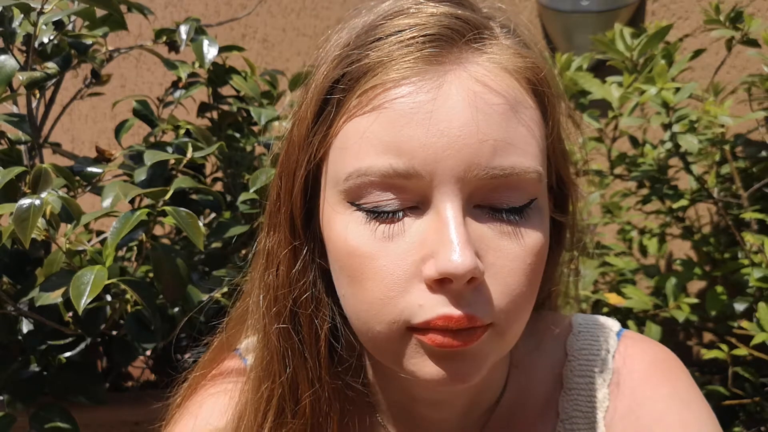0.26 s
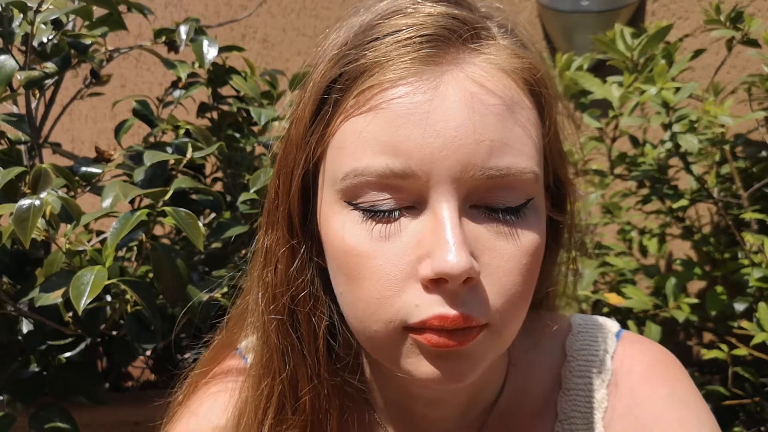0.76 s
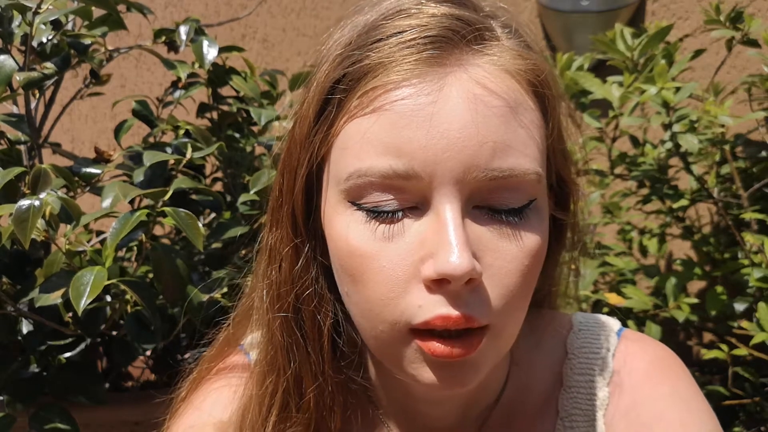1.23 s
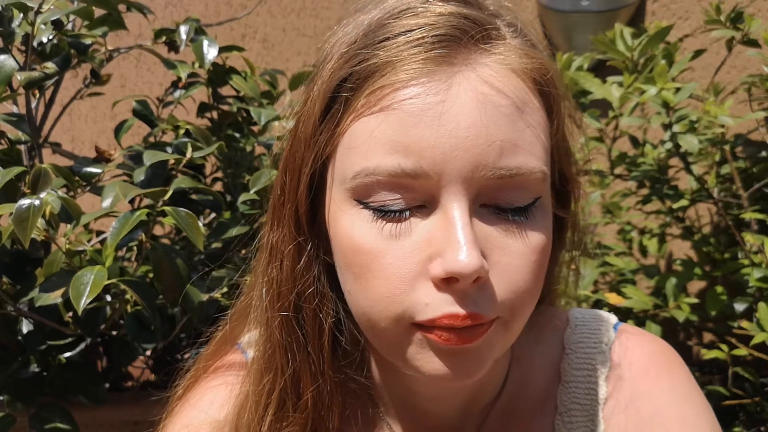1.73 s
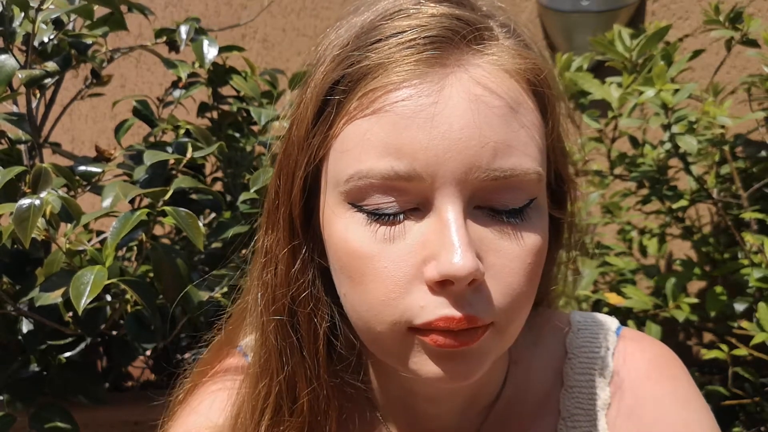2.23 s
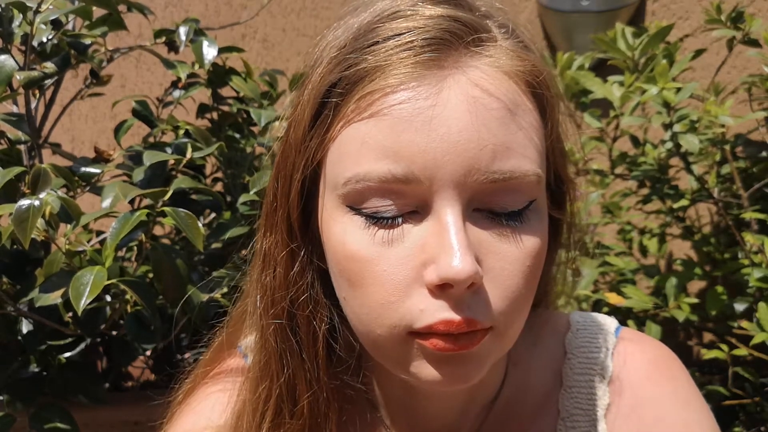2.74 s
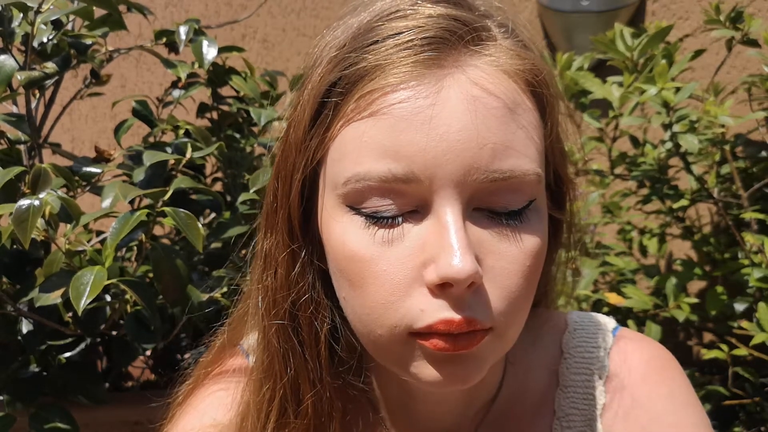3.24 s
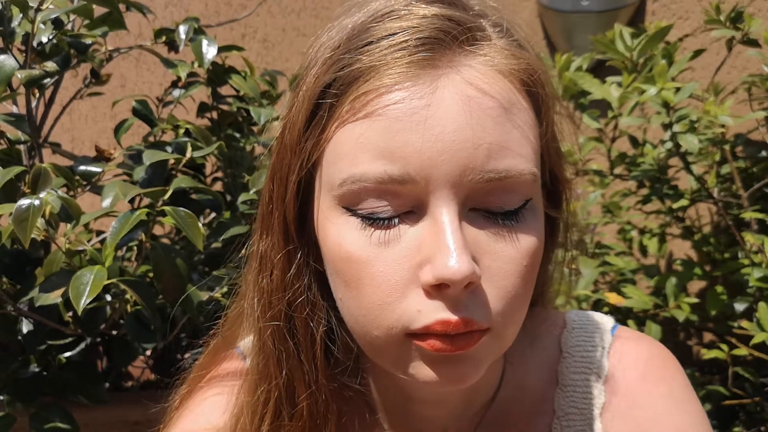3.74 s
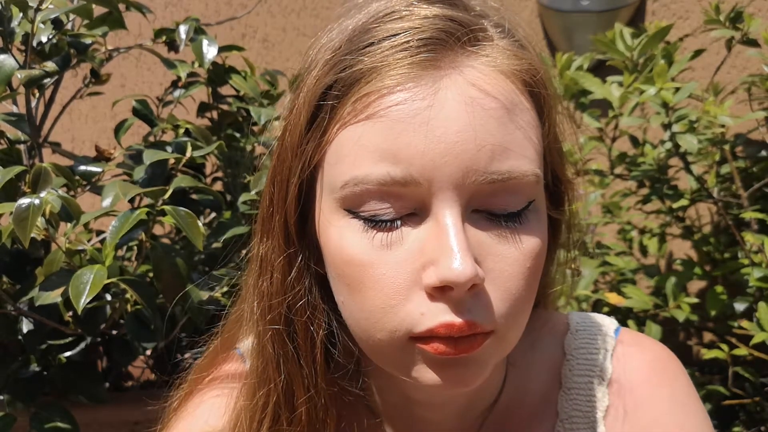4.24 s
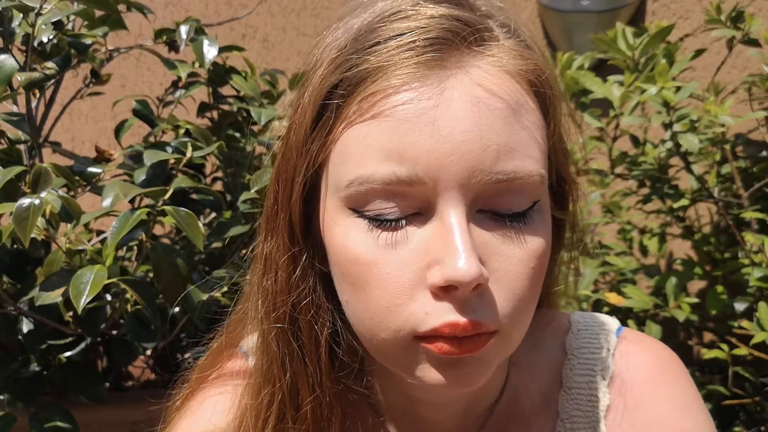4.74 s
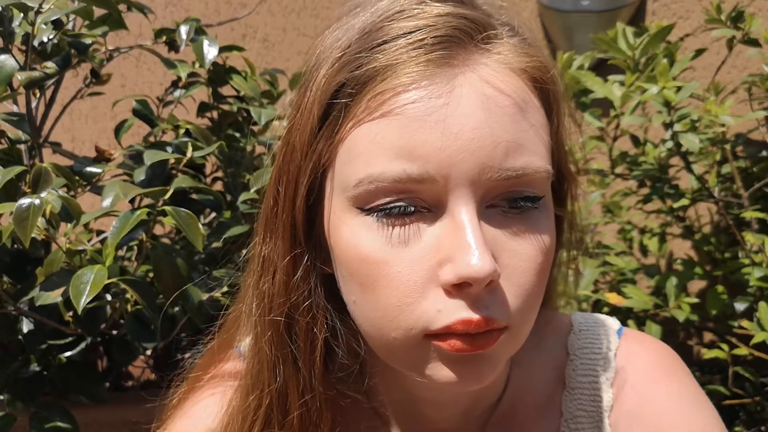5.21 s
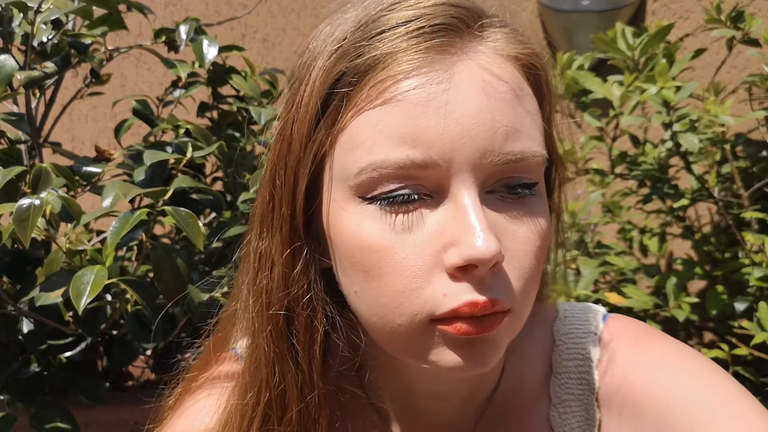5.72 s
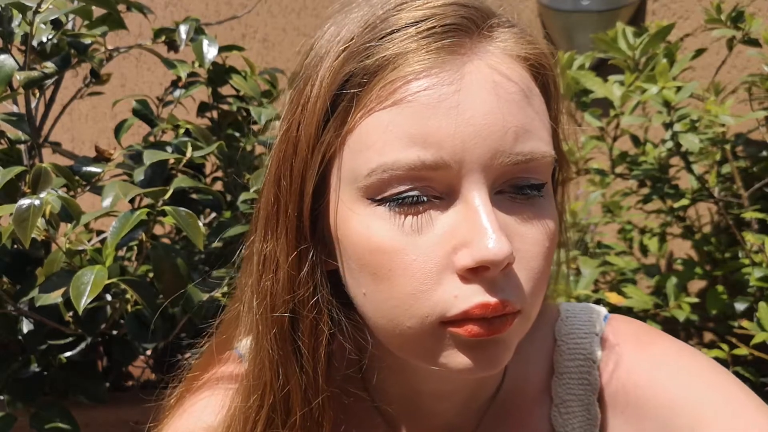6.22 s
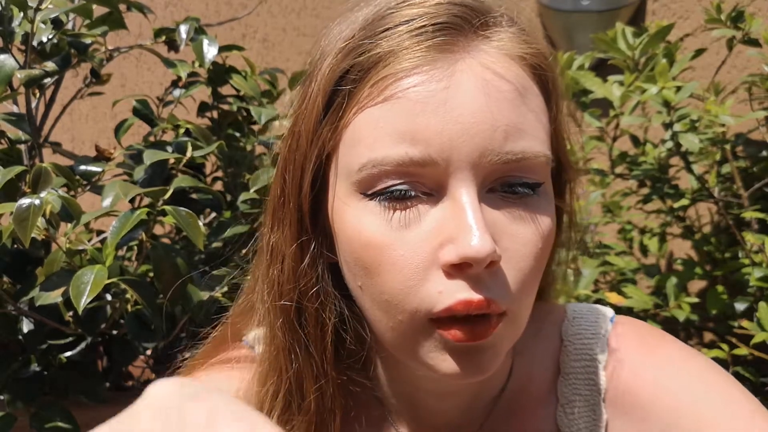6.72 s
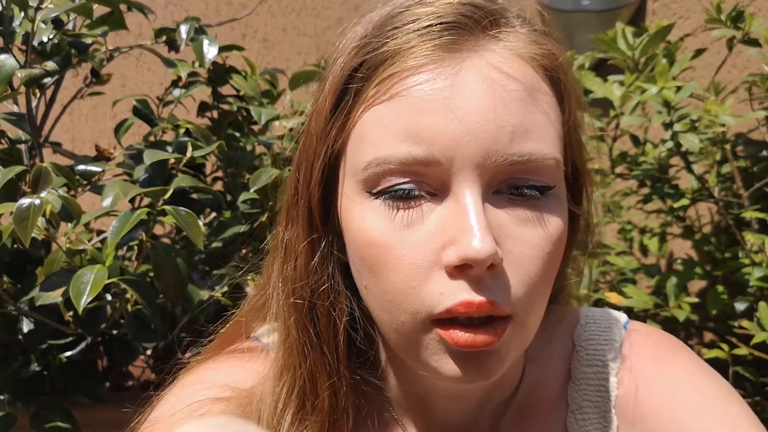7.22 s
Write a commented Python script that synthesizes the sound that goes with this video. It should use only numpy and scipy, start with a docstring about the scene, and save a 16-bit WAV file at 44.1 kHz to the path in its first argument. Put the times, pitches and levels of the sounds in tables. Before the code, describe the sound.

A small plastic jar clicks, crackles and scrapes close to the microphone outdoors, with low wind rumble, faint far traffic and a bird, then a knock.

```python
"""Plastic jar opened in a garden

A small jar is turned and opened close to a microphone; lid and nails tick, crackle and scrape.
Snaps, noise rings and friction noise pass through the resonances of its walls.
Shaped noise makes wind buffeting and a far town; wavering sines make the mount's swing and the hum.
A distant bird sings in gliding sines; at the end a hand knocks on the camera's shell."""
import sys
import numpy as np
from scipy import signal
from scipy.fft import rfft, irfft, next_fast_len
from scipy.io import wavfile
from scipy.ndimage import uniform_filter1d, map_coordinates

SR = 44100
rng = np.random.default_rng(int(sys.argv[2]) if len(sys.argv) > 2 else 0)


def store_wav(level_fs):
    """Save 16-bit WAV to argv[1]."""
    pcm = np.round(np.clip(np.atleast_2d(level_fs), -1, 1) * 32767)
    wavfile.write(sys.argv[1], SR, pcm.T.astype(np.int16))


N = 329427

# response of the jar's walls: (frequency [Hz], gain [dB])
JAR_WALLS = [(500, -44), (1300, -25.5), (1900, -9), (2600, -12.5), (3500, -6.5), (4300, -7.5), (5700, 0.5),
             (6800, 1.5), (7900, 5.5), (10000, 1), (10800, -5.5), (15000, -12), (16500, -32.5)]


def amp(db):
    """Amplitude from dB."""
    return 10 ** (np.asarray(db) / 20)


def unit(x):
    """Scale to rms 1."""
    return x / np.sqrt(np.mean(x ** 2) + 1e-20)


def along(points, hz):
    """Interpolate (frequency [Hz], value) points on a log frequency axis."""
    f, v = np.transpose(points)
    return np.interp(np.log(hz + 1), np.log(f + 1), v)


def curves(rows):
    """One value per sample for each column after the time [s]."""
    s, *cols = np.transpose(rows)
    return [np.interp(np.arange(N) / SR, s, c) for c in cols]


def wobble(knots_per_s):
    """Smooth random curve: a spline through normal random knots."""
    knots = rng.standard_normal(int(N * knots_per_s / SR) + 4)
    return map_coordinates(knots, [np.arange(N) * knots_per_s / SR])


def filtered(x, response):
    """Multiply the spectrum of x by a response of frequency."""
    m = next_fast_len(N + SR // 2)
    return irfft(rfft(x, m) * response(np.fft.rfftfreq(m, 1 / SR)), m)[..., :N]


def rush(spectrum, alike):
    """Stereo noise of rms 1; the mid/side balance sets left-right likeness by frequency."""
    def mid_side_gains(hz):
        angle = np.arccos(np.clip(along(alike, hz), -1, 1)) / 2
        return amp(along(spectrum, hz)) * [np.cos(angle), np.sin(angle)]

    mid, side = filtered(rng.standard_normal((2, N)), mid_side_gains)
    return unit(np.array([mid + side, mid - side]))


def strike(force, colour_db, lead_s, size=4096):
    """Stereo force through a minimum-phase colour; a positive lead puts the left first."""
    hz = np.fft.rfftfreq(size, 1 / SR)
    # folding the cepstrum makes the filter causal
    cepstrum = irfft(colour_db(hz) * np.log(10) / 20)
    cepstrum[1:size // 2] *= 2
    cepstrum[size // 2 + 1:] = 0
    y = irfft(rfft(force, size) * np.exp(rfft(cepstrum)))
    y[1] = np.roll(y[1], round(lead_s * SR))
    energy = np.sum(y ** 2, axis=1, keepdims=True)
    return y / np.sqrt(energy / (.005 * SR))  # rms 1 if packed into 5 ms


def add(track, s, sound, pan_db):
    """Mix a stereo sound in at time s; positive pan is louder on the left."""
    gains = unit(amp([[pan_db / 2], [-pan_db / 2]]))
    part = track[:, round(s * SR):][:, :sound.shape[1]]
    part += (gains * sound)[:, :part.shape[1]]


def spells(rows, attack_s, release_s):
    """Gain of (start [s], length [s], level [dB]) events with linear fades; overlaps add in power."""
    t, power = np.arange(N) / SR, np.zeros(N)
    for s, length_s, db in rows:
        fades = np.minimum((t - s) / attack_s, (s + length_s - t) / release_s)
        gate = np.clip(.5 + fades, 0, 1)
        power += (amp(db) * gate) ** 2
    return np.sqrt(power)


def yard(x, delay_s=0.0045):
    """Wall and hedges scatter sound into a short decaying noise tail, different on each side."""
    # (frequency [Hz], t60 [s])
    decay = [(300, 0.073), (2000, 0.23), (8000, 0.15), (16000, 0.088)]
    hz, t, z = signal.stft(rng.standard_normal((2, SR // 2)), SR, nperseg=256)
    z = z * amp(-60 * t / along(decay, hz)[:, None])
    tail = signal.istft(z, SR, nperseg=256)[1]
    tail = np.pad(tail / np.linalg.norm(tail[0]), ((0, 0), (round(delay_s * SR), 0)))
    return signal.fftconvolve(np.atleast_2d(x), tail, axes=1)[:, :N]


def town(trim_db=5.5, hum_hz=292, hum_db=-62):
    """Far traffic as shaped stereo noise, with a faint hum wavering in level and phase."""
    # traffic colour: (frequency [Hz], gain [dB])
    traffic_spectrum = [(100, -13.5), (230, 3.5), (320, -1), (400, -3.5), (680, -7), (1000, -4.5),
                        (1250, -7.5), (1750, -3), (2400, -10.5), (3200, -17.5), (4300, -27.5), (8000, -30),
                        (11000, -38), (16000, -40)]
    # traffic level: (time [s], level before trim [dB])
    traffic_level = [(0.0, -56), (0.63, -56), (3.32, -58.5), (3.44, -59), (5.24, -58.5), (6.03, -54),
                     (6.55, -60), (7.1, -56)]
    # stereo width: (frequency [Hz], left-right likeness [0..1])
    likeness = [(100, 1), (250, 0.79), (500, 0), (1000, 0), (2000, 0.092), (8000, 0.045)]
    level_db, = curves(traffic_level)
    traffic = amp(level_db + trim_db) * rush(traffic_spectrum, likeness)
    phase = 2 * np.pi * hum_hz * np.arange(N) / SR + wobble(12)
    hum = amp(hum_db + 2.6 * wobble(4)) * unit(np.sin(phase))
    return traffic + hum


def bird(waver=0.0243, arch=0.056):
    """Whistled sine glides, arched in pitch and level, with a slight quaver."""
    # (start [s], length [s], start pitch [Hz], end pitch [Hz], level before distance gain [dB])
    notes = [(0.219, 0.2, 4800, 4870, -63), (.4, .1, 4600, 4400, -68), (.535, .06, 4000, 3820, -71),
             (4.056, 0.14, 2730, 2260, -59.5), (4.255, 0.096, 2900, 3460, -59),
             (4.481, 0.13, 2990, 3840, -60), (4.655, .14, 2293, 2040, -61), (5.017, 0.127, 2608, 2750, -51),
             (5.646, .22, 2460, 2210, -64), (5.95, .28, 2280, 2750, -64)]
    song, quaver = np.zeros(N), 1 + waver * wobble(220)
    for s, length_s, start_hz, end_hz, db in notes:
        u = np.linspace(0, 1, round(length_s * SR))
        span = round(s * SR) + np.arange(len(u))
        glide_hz = start_hz + (end_hz - start_hz) * u
        pitch_hz = glide_hz * (1 + arch * np.sin(np.pi * u)) * quaver[span]
        whistle = np.sin(2 * np.pi * np.cumsum(pitch_hz) / SR)
        song[span] += amp(db) * unit(np.sin(np.pi * u) * whistle)
    return song


def wind(mount_hz=60, mount_trim_db=-1):
    """Gusts over a steady breeze buffet the microphone; its mount swings at one low resonance."""
    # (start [s], length [s], buffet level [dB], flutter level [dB])
    gusts = np.array([(.27, 0.41, -41, -43), (0.965, 0.17, -36, -40), (2.63, .08, -36, -41.5),
                      (3.195, 0.083, -22, -32), (3.34, 0.19, -38, -38), (3.899, 0.051, -23.5, -34.5),
                      (4.233, 0.21, -29, -41.5), (4.722, 0.066, -24, -35), (5.543, 0.36, -34.5, -44.5),
                      (6.035, 0.39, -34, -44.5), (6.705, 0.074, -38, -38.5), (7.214, 0.1, -30.5, -47.5)])
    # spells of mount swing: (start [s], length [s], level before trim [dB])
    swings = [(.26, 0.37, -24), (.66, 0.14, -28.5), (.88, .28, -24), (1.3, 0.34, -29), (1.8, 0.29, -30.5),
              (2.24, 0.18, -35), (2.83, 0.26, -32.5), (3.34, 0.15, -25.5), (4.2, .33, -32),
              (4.65, 0.764, -37.5), (5.55, 0.7, -36.5), (6.02, 0.28, -32), (6.3, 0.66, -38),
              (7.38, 0.068, -28.5)]
    # low rumble colour: (frequency [Hz], gain [dB])
    buffet_spectrum = [(8, -14.5), (18, 2), (30, -0.5), (46, 5.5), (56, -4.5), (80, -10.5), (200, -72),
                       (600, -130)]
    # higher rumble colour: (frequency [Hz], gain [dB])
    flutter_spectrum = [(50, -41.5), (75, -2.5), (97, 3), (118, -5.5), (150, -6), (180, -12), (230, -16),
                        (300, -22.5), (500, -50.5), (2500, -120)]
    gust_attack_s, gust_release_s = 0.053, 0.059
    swing_attack_s, swing_release_s = 0.099, 0.051
    # steady floor between the gusts; the swing floor is before trim
    breeze_buffet_db, breeze_flutter_db, breeze_swing_db = -36.5, -43.5, -45

    gust_buffet = spells(gusts[:, [0, 1, 2]], gust_attack_s, gust_release_s)
    gust_flutter = spells(gusts[:, [0, 1, 3]], gust_attack_s, gust_release_s)
    buffet_gain = np.hypot(amp(breeze_buffet_db), gust_buffet)
    flutter_gain = np.hypot(amp(breeze_flutter_db), gust_flutter)
    shake = np.hypot(amp(breeze_swing_db), spells(swings, swing_attack_s, swing_release_s))

    phase = 2 * np.pi * mount_hz * np.arange(N) / SR + 0.9 * wobble(9)
    mount = shake * amp(mount_trim_db + wobble(28)) * unit(np.sin(phase))
    buffet = buffet_gain * rush(buffet_spectrum, [(30, np.cos(.11))])
    flutter = flutter_gain * rush(flutter_spectrum, [(80, 1.0), (250, 0.9)])
    return mount + buffet + flutter


def knocks(rattle=0.066, t60_s=0.034, size=2048):
    """Each touch is one push and a short noise rattle through the camera's shell."""
    # (time [s], level [dB], dullness [dB per octave, 600-3500 Hz], left over right [dB])
    touches = [(7.1183, -29.5, 11, 0), (7.146, -26, 3.5, 1), (7.254, -43, 0.5, -1.5),
               (7.294, -43.5, 4.5, -3.5), (7.4374, -14, -1, 2.5), (7.4667, -21.5, -1, 5)]
    # shell response: (frequency [Hz], gain [dB])
    shell = [(100, -24), (300, -5), (450, -8.5), (680, -12), (1000, 2.5), (1400, -1.5), (1800, 4.5),
             (2600, -5.5), (3100, -18.5), (4000, -23.5), (5000, -25), (7200, -39), (10000, -52),
             (16000, -73.5)]
    out, t = np.zeros((2, N)), np.arange(size) / SR
    for s, db, dull_db, pan_db in touches:
        force = rattle * rng.standard_normal((2, size)) * amp(-60 * t / t60_s)
        force[:, 0] = -1  # the push

        def colour_db(hz):
            return along(shell, hz) - dull_db * np.log2(np.clip(hz, 600, 3500) / 1000)

        add(out, s, amp(db) * strike(force, colour_db, lead_s=.00008), pan_db)
    return out


def rubbing():
    """How hard fingers and thread slide, as a gain."""
    # (start [s], length [s], strength before scrape trim [dB])
    strokes = [(.33, .45, -69), (.92, .3, -75.5), (1.3, .13, -57), (1.48, .26, -65), (2.27, .33, -63),
               (2.6, .32, -59), (3.04, .58, -62), (3.77, .14, -58), (4.0, .57, -60), (4.7, .17, -64),
               (5.05, .1, -73), (5.32, .22, -56), (5.6, .52, -61), (6.15, .07, -49), (6.3, .12, -72)]
    return spells(strokes, attack_s=.05, release_s=.06)


def scrape(trim_db=-5, grain_db=6.0, grains_per_s=900):
    """Sliding plastic sheds tiny uneven slips, heard as grainy noise through the jar's walls."""
    sizes = amp(grain_db * np.minimum(rng.exponential(size=N), 3))
    slips = (rng.random(N) < grains_per_s / SR) * sizes
    spread = np.sqrt(np.abs(uniform_filter1d(slips ** 2, size=40)))
    friction = spread * rng.standard_normal((2, N))
    light_touch = [(2000, -3), (4500, 4.5), (8000, -7.5), (16000, -2.0)]  # (Hz, dB)
    coloured = filtered(friction, lambda hz: amp(along(JAR_WALLS, hz) + along(light_touch, hz)))
    return rubbing() * amp(trim_db) * unit(coloured)


def crackles(t60_s=0.013, ring_hz=4200, ring_octaves=.75, scatter_db=3.0, edge_db=0, count=7):
    """The thread sticks and lets go in quick runs of uneven slips, returned as tick rows."""
    # (start [s], length [s], median slip level [dB], body gain [dB])
    runs = [(0.269, 0.018, -40, -5), (0.947, 0.039, -56.5, 4.5), (1.104, 0.046, -55.5, 13.5),
            (1.19, 0.037, -29.5, 1.5), (1.219, 0.029, -36.5, 7), (1.353, 0.012, -37.5, -1),
            (2.012, .035, -46, 4), (2.609, .09, -50, 0), (2.723, .018, -37, 5), (2.879, 0.038, -48.5, -2),
            (4.325, .1, -46, 8.5), (4.852, .05, -38.5, 15), (5.305, 0.014, -38.5, 2)]
    rows = []
    for s, length_s, db, body_db in runs:
        times = s + length_s * (np.arange(count) + rng.random(count)) / count
        for at, (force, place) in zip(times, rng.standard_normal((count, 2))):
            slip_hz = ring_hz * 2 ** (ring_octaves * place)
            rows.append((at, db + scatter_db * force, t60_s, slip_hz, body_db, edge_db))
    return rows


def nail_ticks(level_db=-49.0, scatter_db=3, t60_s=.012, ring_hz=6800, ring_octaves=0.63,
               body_db=4, edge_db=1, crowding=0.41, count=52):
    """Faint random ticks, denser under harder rubbing, returned as tick rows."""
    travel = np.cumsum(rubbing() ** crowding)
    marks = travel[-1] * (np.arange(count) + rng.random(count)) / count
    times = np.searchsorted(travel, marks) / SR
    rows = []
    for s, (force, place) in zip(times, rng.standard_normal((count, 2))):
        tick_hz = ring_hz * 2 ** (ring_octaves * place)
        rows.append((s, level_db + scatter_db * force, t60_s, tick_hz, body_db, edge_db))
    return rows


def ticks(snap=0.6, snap_t60_s=0.0068, alike_s=0.00098, lead_in_db=-21, lead_in_s=.014,
          resonance_db=8.5, octaves=.21, body_hz=4300, edge_hz=10500, pan_scatter_db=1.5, size=2400):
    """Each slip is a sharp snap, then a dense ring that the walls radiate differently to each side."""
    # lid snaps and taps:
    # (time [s], level [dB], ring t60 [s], resonance [Hz], body gain [dB], edge gain [dB])
    lid_ticks = [(.1327, -46.5, .007, 2800, 14, 12), (.253, -36, 0.0033, 7800, -8, 5),
                 (.276, -24.5, .015, 10900, -1.5, -6.5), (0.2882, -29, 0.0055, 13600, -8, 9.5),
                 (0.306, -28.5, .0056, 8800, -17, 5), (.3643, -45.5, .016, 8100, 0, 6),
                 (.691, -41, 0.0071, 8800, 5, 8), (.762, -49, .009, 9400, 18, 15),
                 (0.7865, -37.5, 0.0068, 10300, 5, -1.5), (0.8816, -34.5, .006, 9700, -20, 17.5),
                 (1.0013, -43.5, .006, 5600, -1, 12), (1.1537, -28, .005, 7900, 2, 5.5),
                 (1.1597, -29, 0.0083, 9600, 7.5, 0.5), (1.186, -21, .003, 6840, -8, 2.5),
                 (1.1994, -23.5, .004, 7900, -7, -2.5), (1.2082, -27, 0.0058, 8000, -4, -1.5),
                 (1.2171, -20, .014, 3420, -14, -4), (1.2218, -18.5, .003, 11700, -19, -11),
                 (1.2325, -21, .011, 3320, -7, 4.5), (1.2655, -34, .014, 7260, 3, 0),
                 (1.315, -41, .009, 2200, 8, -7), (1.3345, -21.5, .005, 5130, -8, -5.5),
                 (1.3488, -21, .004, 7000, -13, -11), (1.3569, -23, 0.02, 3450, 2.5, -12),
                 (1.374, -27, 0.0057, 14000, -9, -7), (1.4067, -37, .006, 4200, 6, -9),
                 (1.4641, -29.5, 0.0074, 7400, 4, 6), (1.486, -27, .01, 5870, 5.5, 2.5),
                 (1.5488, -33, 0.003, 5200, -4, -5.5), (1.5971, -38.5, 0.0093, 8200, -6, -2),
                 (1.6504, -45.5, .008, 7000, 14.5, 0), (1.7015, -32, .013, 8450, -4.5, 1),
                 (1.9514, -32, 0.0085, 5230, 5, -15), (2.002, -39, 0.014, 7800, 13, 5),
                 (2.0075, -23.5, 0.005, 8200, 5, 8.5), (2.035, -36.5, .007, 4940, 3, -1),
                 (2.064, -42.5, 0.0081, 14050, -7, -4), (2.1951, -44, .013, 3200, 4, -12),
                 (2.3261, -39, 0.012, 10800, 7.5, -12), (2.4536, -29, .005, 12100, 1.5, 8.5),
                 (2.5714, -28.5, 0.0084, 14100, -22, 3.5), (2.6885, -39, .008, 7800, 5, 6),
                 (2.7155, -30, 0.0076, 7850, -6, 4), (2.7892, -29, 0.015, 3780, 0, 6),
                 (2.8498, -37.5, .008, 2300, -14, -1.5), (2.9418, -36.5, .009, 5860, -13, -2),
                 (3.0023, -35.5, .015, 7200, 4, 4), (3.0184, -29.5, .014, 14000, 2, -10.5),
                 (3.0263, -29, 0.011, 4300, 0, -1), (3.151, -20, 0.012, 5600, 0, -3),
                 (3.17, -25, 0.021, 5200, 5, 3), (3.3095, -23.5, .006, 4230, 1, 0),
                 (3.3987, -30.5, .004, 6000, -14, 0.5), (3.5291, -36, 0.009, 11000, -4, 8),
                 (3.5925, -45.5, .017, 3800, 10, 0), (3.6749, -31.5, .0065, 9300, -1, 16.5),
                 (3.78, -30.5, 0.0092, 5350, 11.5, 11), (3.882, -42, 0.017, 6400, 3.5, 2),
                 (4.0246, -34, 0.018, 8150, 7, 3), (4.2696, -35, 0.009, 7700, 10.5, -0.5),
                 (4.3639, -33.5, 0.006, 9000, 1, 4), (4.4023, -38.5, .009, 5100, 8, 2),
                 (4.4265, -34, 0.0058, 3700, 0, 8), (4.4625, -28.5, 0.0093, 3500, -7, 1),
                 (4.5088, -32, .008, 2300, -7.5, 1), (4.5972, -40, 0.0091, 8000, 15.5, -9),
                 (4.6444, -34, 0.0057, 13600, -8, -9), (4.6787, -37, 0.011, 2400, 1, -4),
                 (4.694, -38, 0.018, 9900, 12, 7), (4.7232, -41, 0.01, 2310, 22, 1),
                 (4.8382, -37, .009, 4700, 9, 7), (4.877, -28.5, 0.026, 4600, 23, 2),
                 (4.8944, -27, 0.0096, 14000, 5, -2.5), (4.9836, -45, .013, 4500, -7, -22),
                 (5.1547, -36.5, 0.016, 2170, 4.5, -1), (5.2737, -26, 0.052, 5560, 8, -7),
                 (5.2799, -26.5, 0.0096, 2480, -1, 0.5), (5.2994, -33, 0.019, 5300, 4, 1),
                 (5.4007, -31.5, 0.042, 5550, 3, -1), (5.4329, -39, 0.0096, 10800, 4, 3),
                 (5.462, -40.5, 0.029, 12900, 11, -18), (5.5646, -28, 0.018, 4800, 9.5, 4),
                 (5.6633, -24.5, 0.038, 2740, 2.5, 6.5), (5.6803, -32.5, 0.017, 6300, 6, 0),
                 (5.7816, -37.5, 0.11, 2400, 18, -8), (5.7987, -30.5, 0.019, 4280, -11, 4.5),
                 (5.8727, -35.5, 0.016, 8500, 15, -3), (5.998, -37.5, 0.029, 11600, 8, -6),
                 (6.1009, -24.5, 0.014, 10000, 13.5, 11.5), (6.1229, -31, 0.011, 2900, 11, 0),
                 (6.2267, -23.5, 0.011, 2630, 5, 6.5), (6.3418, -47.5, .017, 2300, -4, 1),
                 (6.379, -41, 0.027, 2300, 13.5, 8.5), (6.3991, -42, 0.053, 2200, -2, 11)]
    # where the hands hold the jar: (time [s], left over right before scatter [dB])
    jar_pan = [(.27, 1.5), (.9, -3), (1.2, 1.5), (1.7, 5.5), (2.05, 1), (3.2, 0.5), (4.7, 0), (5.3, -1),
               (6.1, -8.5), (6.4, -3.5)]
    out, start = np.zeros((2, N)), size // 5
    t = (np.arange(size) - start) / SR
    shared = np.exp(-np.abs(t) / alike_s)  # both ports hear the same first wave
    for s, db, t60_s, ring_hz, body_db, edge_db in lid_ticks + crackles() + nail_ticks():
        pan_db = np.interp(s, *np.transpose(jar_pan)) + pan_scatter_db * rng.standard_normal()
        noise = rng.standard_normal((3, size))
        force = np.sqrt(shared) * noise[0] + np.sqrt(1 - shared) * noise[1:]
        # faint fade-in (60 dB per lead_in_s), then the ring's decay
        force *= amp(np.where(t < 0, lead_in_db + 60 * t / lead_in_s, -60 * t / t60_s))
        force /= np.linalg.norm(force, axis=1, keepdims=True)
        # shorter ticks have more snap against their ring
        force[:, start] = snap * min(snap_t60_s / t60_s, 2)

        # the place of contact decides which parts of the wall ring most
        def colour_db(hz):
            body = body_db / (1 + (hz / body_hz) ** 8)
            edge = edge_db * (1 - 1 / (1 + (hz / edge_hz) ** 12))
            peak = resonance_db * np.exp(-(np.log2((hz + 1) / ring_hz) / octaves) ** 2)
            return along(JAR_WALLS, hz) + body + edge + peak

        lead_s = -.00003 + .00003 * min(pan_db, 0)  # right-hand ticks reach the left port later
        add(out, s + t[0], amp(db) * strike(force, colour_db, lead_s), pan_db)
    return out


def scene(wet_db=-16, near_echo_db=-23, near_delay_s=0.0063):
    """Close, nearly dry jar with one echo off a nearby surface; the far bird has a strong tail."""
    jar, song, touch = ticks() + scrape(), bird(), knocks()
    echo = amp(near_echo_db) * np.roll(jar, round(near_delay_s * SR), axis=1)
    close_jar = jar + echo + amp(wet_db) * yard(jar)
    close_touch = touch + amp(-16) * yard(touch)
    far_bird = amp(-7.5) * song + amp(-4.0) * yard(song)
    return close_jar + close_touch + far_bird + wind() + town()


def record(dry, ceiling=1.0, top_hz=16900):
    """The camera rounds off the highest peaks and keeps nothing above its band limit."""
    rounded = dry / (1 + (dry / ceiling) ** 6) ** (1 / 6)
    return filtered(rounded, lambda hz: hz < top_hz)


dry = scene()
out = record(dry)
store_wav(out)
```